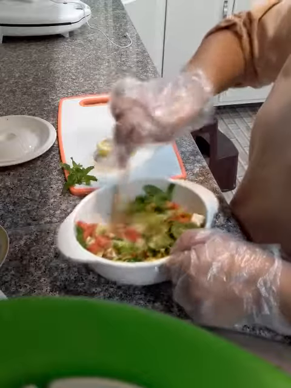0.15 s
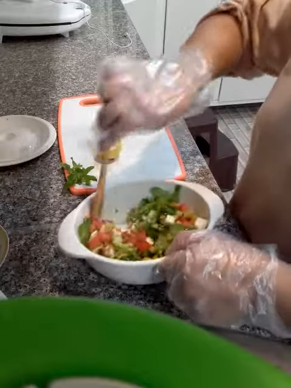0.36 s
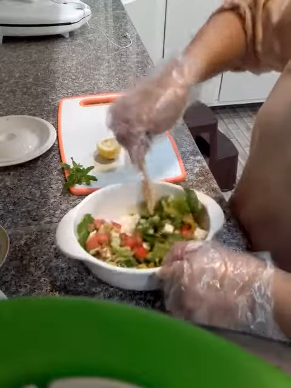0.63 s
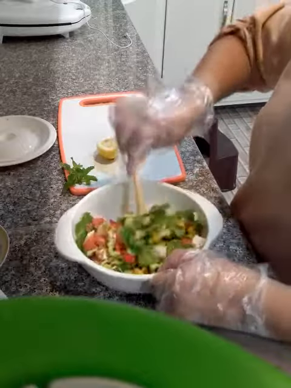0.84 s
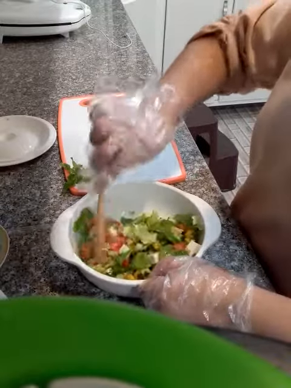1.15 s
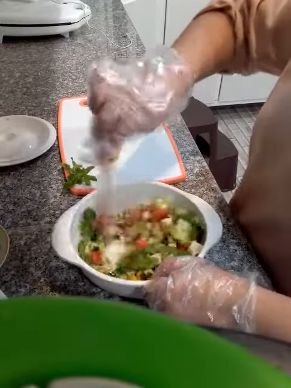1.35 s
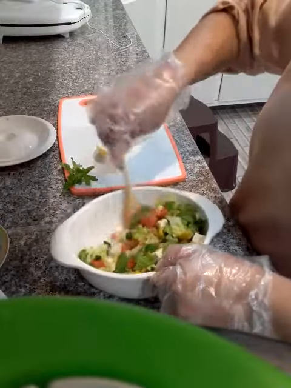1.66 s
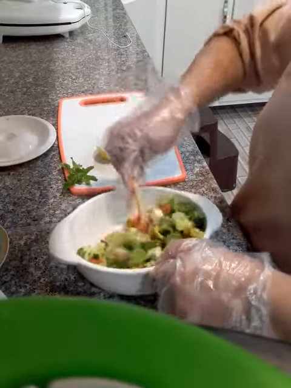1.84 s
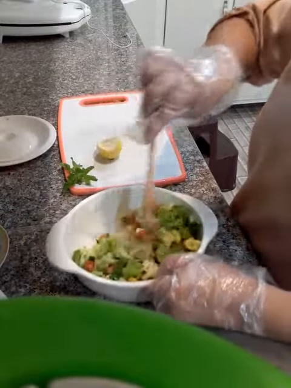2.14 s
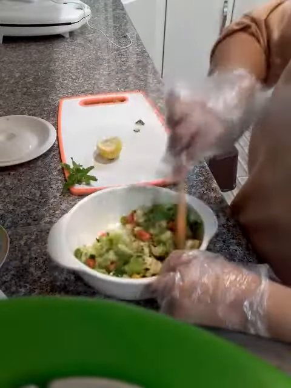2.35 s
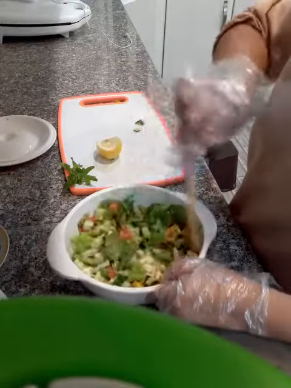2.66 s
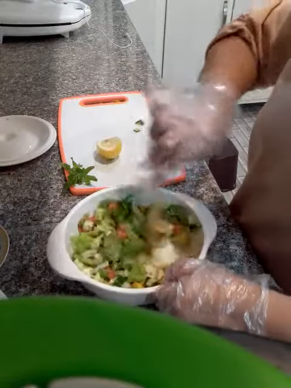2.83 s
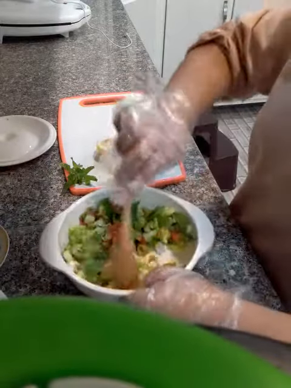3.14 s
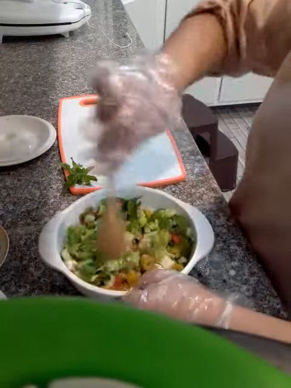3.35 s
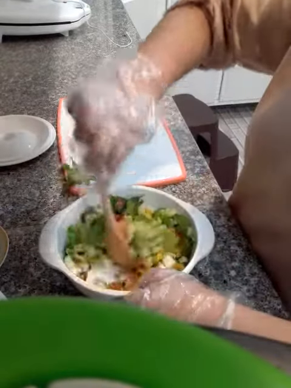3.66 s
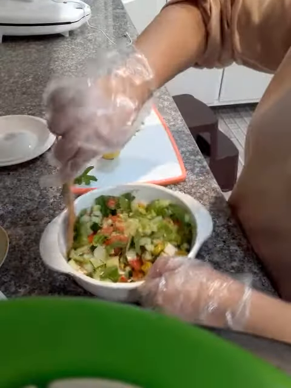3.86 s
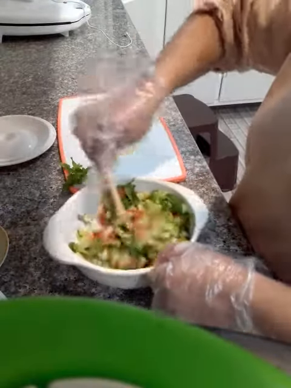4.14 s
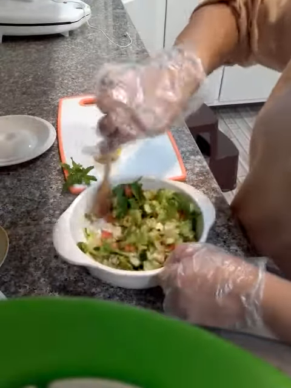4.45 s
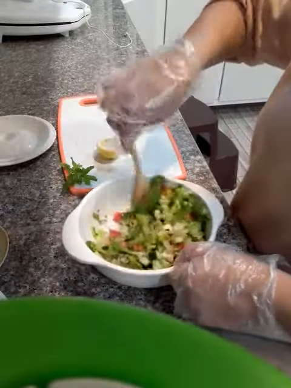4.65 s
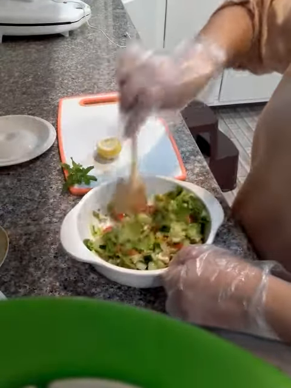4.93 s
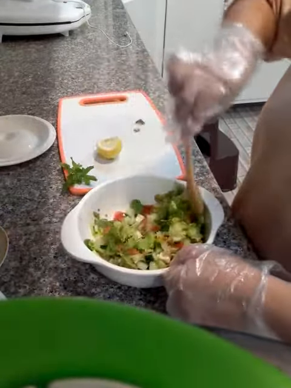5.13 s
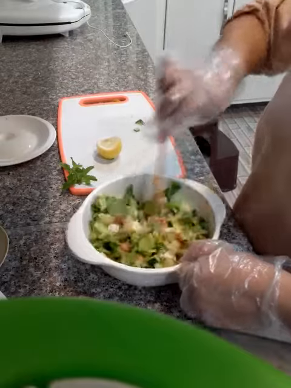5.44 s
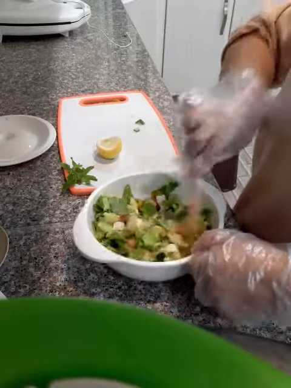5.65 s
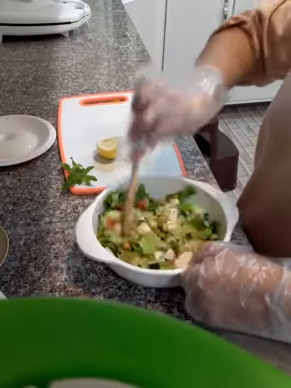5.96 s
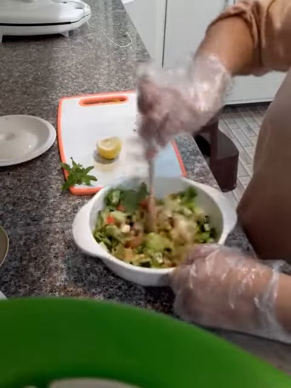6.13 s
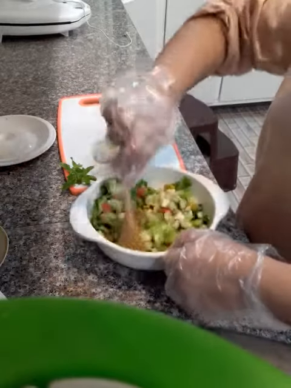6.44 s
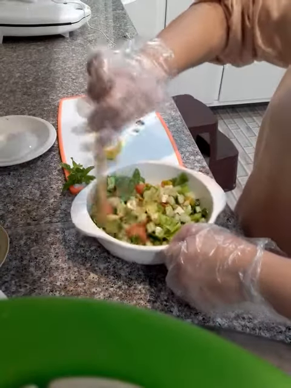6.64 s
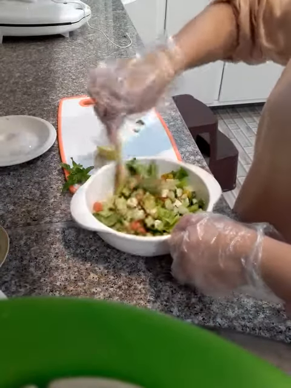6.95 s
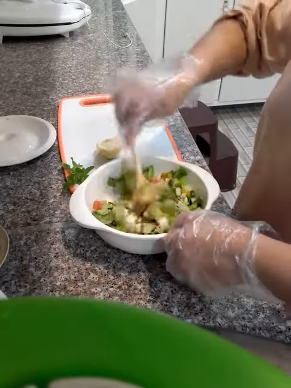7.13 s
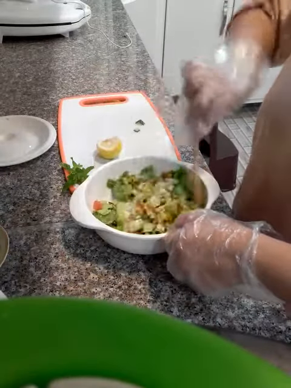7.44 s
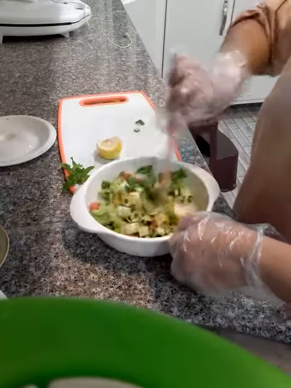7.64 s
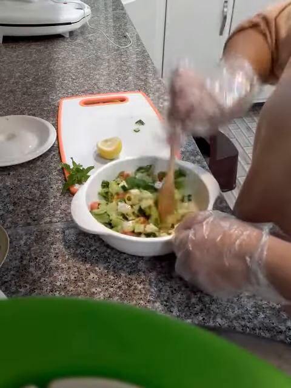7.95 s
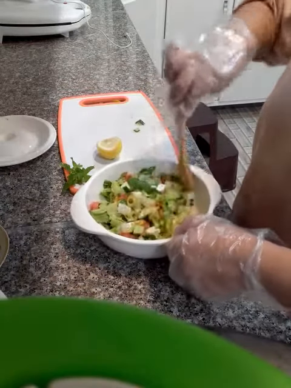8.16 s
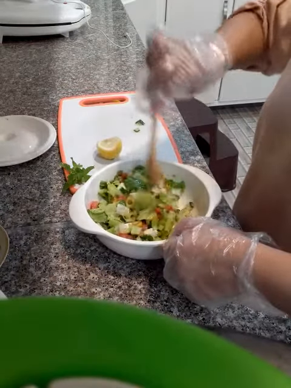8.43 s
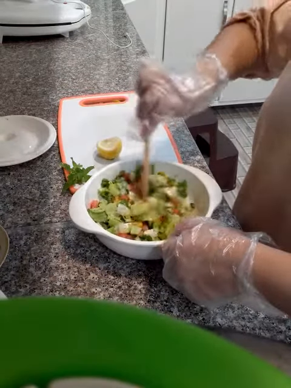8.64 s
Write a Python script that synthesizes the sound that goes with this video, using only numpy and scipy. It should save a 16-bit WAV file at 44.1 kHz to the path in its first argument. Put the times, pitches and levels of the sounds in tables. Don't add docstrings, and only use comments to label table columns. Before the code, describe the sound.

A small close mono microphone in a hard-walled kitchen hears a wooden spoon tossing dressed salad in a ceramic bowl, with thin bass, soft hiss and a short bright room answer. A sharp clink opens at 0.1 seconds, followed by wet rustling strokes, gloves crinkling and small leafy ticks. Another clink at 0.5 and a firmer one at 1.5 start longer sweeps. From 2.4 to 2.9 comes a tight cluster of woody knocks, scrapes, a clink and dull bumps of the bowl's foot on stone. Rustling sweeps resume at 3.5 and 3.9, with a heavy bump near 4.4 and a clink at 4.5. A hard crunchy double knock lands at 5.8, a clink at 6.4, a knock at 6.8. Clinks at 7.4 and 7.8 lead to a solid clack and thump near 7.95, then lighter rustling fades toward 8.8.

```python
import sys
import numpy as np
from scipy import signal
from scipy.fft import rfft, irfft, next_fast_len
from scipy.io import wavfile
from scipy.ndimage import map_coordinates

SR = 44100
rng = np.random.default_rng(int(sys.argv[2]) if len(sys.argv) > 2 else 0)


def bounce(signal):
    frames = np.transpose(np.atleast_2d(signal))
    limited = np.clip(frames, -1, 1)
    pcm = np.round(limited * 32767).astype(np.int16)
    wavfile.write(sys.argv[1], SR, pcm)


def decibels_to_gain(level_db):
    exponent = np.asarray(level_db, float) / 20
    return 10 ** exponent


N = 387638


def unit(x):
    return x / np.sqrt(np.mean(x ** 2) + 1e-20)


def along(points, hz):
    point_hz, value = np.transpose(points)
    return np.interp(np.log(hz + 1), np.log(point_hz + 1), value)


def wobble(rate_hz):
    knots = rng.standard_normal(int(N * rate_hz / SR) + 4)
    return map_coordinates(knots, [np.arange(N) * rate_hz / SR])


def filtered(x, response):
    m = next_fast_len(N + SR // 2)
    return irfft(rfft(x, m) * response(np.fft.rfftfreq(m, 1 / SR)), m)[:N]


def noise_coloured(points):
    return filtered(rng.standard_normal(N), lambda hz: decibels_to_gain(along(points, hz)))


def crackle(rate_hz, spread_db, share):
    slips = (rng.random(N) < rate_hz / SR) * decibels_to_gain(spread_db * rng.standard_normal(N))
    slips = slips * rng.choice([-1, 1], size=N)
    return np.sqrt(share) * unit(slips) + np.sqrt(1 - share) * rng.standard_normal(N)


# frequency in Hz, t60 in seconds.
KITCHEN_DECAY = [(150, 0.3), (600, 0.33), (1500, 0.45), (4000, 0.55), (8000, 0.36), (14000, 0.19)]


def tail(seconds):
    hz, t, z = signal.stft(rng.standard_normal(int(seconds * SR)), SR, nperseg=256)
    decay = decibels_to_gain(-60 * t / along(KITCHEN_DECAY, hz)[:, None])
    room = signal.istft(z * decay, SR, nperseg=256)[1]
    room[:int(0.006 * SR)] = 0
    return room / np.linalg.norm(room)


# frequency in Hz, density in dB per Hz.
AIR_CURVE = [(19, -9), (32, -11), (54, -21), (134, -11.5), (299, -7), (388, -7), (870, -3), (1280, -14.5),
             (1500, -8.5), (2880, -18.5), (11400, -23.5), (16000, -18.5)]


def air():
    return decibels_to_gain(-64.5) * unit(noise_coloured(AIR_CURVE))


def gestures(rows, attack_s, sag_db_per_s, release_db_per_s):
    out = np.zeros((len(rows[0]) - 2, N + SR))
    t = np.arange(SR) / SR
    for start_s, length_s, *levels_db in rows:
        fall_db = sag_db_per_s * t + release_db_per_s * np.maximum(t - length_s, 0)
        shape = np.clip(t / attack_s, 0, 1) ** 2 * decibels_to_gain(-fall_db)
        out[:, round(start_s * SR):][:, :SR] += decibels_to_gain(levels_db)[:, None] * shape
    return out[:, :N]


# start in seconds, length in seconds, rustle in dB, pressure on the bottom in dB.
STROKES = [(0.0, .06, -80, -62), (0.1, 0.16, -58, -54.5), (0.47, 0.27, -57.5, -54.5),
           (0.75, .13, -62.5, -54), (0.9, 0.29, -74, -70), (1.19, 0.12, -60, -51.5), (1.51, 0.57, -57, -53),
           (2.36, 0.16, -66, -63), (2.49, .23, -68.5, -61), (2.75, .28, -61, -60), (3.09, .15, -60.5, -59),
           (3.52, 0.17, -60, -55.5), (3.86, 0.42, -57, -54.5), (4.49, 0.28, -57.5, -54.5),
           (4.92, .14, -65, -65), (5.18, 0.15, -63.5, -65), (5.27, 0.035, -56, -56),
           (5.52, 0.047, -65, -68), (5.64, 0.31, -56.5, -54), (6.05, .14, -59.5, -55),
           (6.29, 0.11, -57.5, -50.5), (6.42, 0.13, -59, -59), (6.77, 0.18, -59, -57),
           (7.02, 0.048, -63, -56.5), (7.45, 0.17, -58.5, -53.5), (7.82, 0.31, -57.5, -70.5),
           (8.2, 0.12, -61, -66), (8.61, 0.091, -67.5, -70)]
# start in seconds, length in seconds, bottom grind in dB, leaf crush in dB.
DIGS = [(0.1, 0.092, -68, -48), (0.49, 0.03, -62, -58), (2.5, 0.13, -45.5, -64), (2.65, 0.036, -39.5, -56),
        (2.79, 0.072, -50, -45), (2.87, 0.018, -44, -48), (3.69, 0.03, -56.5, -72), (4.14, 0.031, -63, -65),
        (5.78, 0.021, -31, -34.5), (6.42, 0.013, -43, -45), (7.96, 0.04, -44, -44.5),
        (8.12, 0.027, -50, -71)]


def motion():
    rustle, press = gestures(STROKES, attack_s=0.01, sag_db_per_s=12.5, release_db_per_s=126.5)
    grind, crush = gestures(DIGS, attack_s=0.02, sag_db_per_s=0, release_db_per_s=253.5)
    rest_rustle_db, rest_scrape_db, leaves_over_rustle_db = -81.5, -73, -1
    return rustle + decibels_to_gain(rest_rustle_db), press + grind + decibels_to_gain(rest_scrape_db), decibels_to_gain(leaves_over_rustle_db) * rustle + crush


# frequency in Hz, width in Hz, level in dB.
SCRAPE_MODES = [(330, 100, -9), (647, 90, -0.5), (873, 40, 3.5), (1061, 104, -1.5), (1550, 340, -8.5)]
# frequency in Hz, density in dB per Hz.
LEAF_CURVE = [(500, -62), (1200, 4.5), (2000, 8.5), (3500, 3), (5500, -12.5), (9000, -56), (16000, -49.5)]
# frequency in Hz, density in dB per Hz.
FIZZ_CURVE = [(1500, -42.5), (3000, -2), (5500, -1.5), (9000, -5.5), (12000, -5), (15800, -16),
              (20000, -18.5)]


def bottom_response(f):
    total = 0
    for k, (centre, width, db) in enumerate(SCRAPE_MODES):
        damping = 1j * f * width
        total = total + (-1) ** k * decibels_to_gain(db) * damping / (centre * centre - f * f + damping)
    return total


def stirring():
    rustle, press, crush = motion()
    jerk = wobble(45)
    rub = decibels_to_gain(2.6 * jerk + 1.4 * wobble(30)) * crackle(900, spread_db=-1.0, share=0.43)
    scrape = filtered(rub, bottom_response)
    tumble = decibels_to_gain(3.7 * jerk + 1.4 * wobble(18)) * crackle(590, spread_db=6.0, share=0.32)
    leaves = filtered(tumble, lambda hz: decibels_to_gain(along(LEAF_CURVE, hz)))
    fizz_db = 0.96 * jerk + 2.4 * wobble(120) + 0.5 * wobble(9.5)
    fizz = decibels_to_gain(fizz_db) * crackle(500, spread_db=4.5, share=0.23)
    fizz = filtered(fizz, lambda hz: decibels_to_gain(along(FIZZ_CURVE, hz)))
    return press * unit(scrape) + crush * unit(leaves) + rustle * unit(fizz)


# frequency in Hz, density in dB per Hz.
RUMBLE_CURVE = [(40, -38.5), (85, -4), (130, 2), (220, -3.5), (330, -3.5), (500, -15.5), (900, -69.5)]


def counter():
    press = motion()[1]
    drag = unit(noise_coloured(RUMBLE_CURVE))
    return decibels_to_gain(-66 + 1.7 * wobble(5.9)) * (press / np.median(press)) ** 0.32 * drag


# frequency in Hz, level in dB, t60 in seconds.
BOWL_MODES = [(132, -3, .12), (203, -4, 0.028), (306.6, -2.5, 0.096), (428, 3.5, 0.045), (560.6, -8, 0.012),
              (611, -6, 0.043), (744, -17.5, 0.0045), (837, -2, 0.032), (976, 0.5, 0.018),
              (1043, -17.5, 0.022), (1162, -13.5, 0.028), (1133, -4.5, 0.034), (1487, 0, 0.029),
              (1603, -4.5, .025), (1785, -8, 0.052), (1873, -8.5, 0.014), (2049, -9.5, 0.033),
              (2100, -29.5, 0.0049), (2542, -5, 0.0037), (2751, -2, 0.01), (3100, -3.5, 0.0065),
              (3410, -7, 0.032), (3600, -1.5, 0.035), (3840, -6.5, 0.013), (4695, -2, 0.0093),
              (5920, 0, 0.0071), (6230, -0.5, 0.012), (6960, -10, .02)]


def strike(levels, favoured, contact_s, hold_s, clack_db, wet_db):
    t = np.arange(SR // 6) / SR
    late = np.maximum(t - hold_s, 0)
    modes = BOWL_MODES + [(f, lift_db, 0.027) for f, lift_db in favoured]
    hz, db, t60 = np.transpose(modes)[:, :, None]
    db = db + along(levels, hz) + rng.normal(0, 0.3, hz.shape)
    rise = 1 - np.exp(-(t / (contact_s + 0.73 / hz)) ** 2)
    tones = np.sin(2 * np.pi * (hz * t + rng.random(hz.shape)))
    ring = (decibels_to_gain(db - 60 * late / t60) * rise * tones).sum(0)

    burst_rise = 1 - np.exp(-(t / contact_s / 2.18) ** 2)
    burst = rng.standard_normal(len(t)) * decibels_to_gain(-60 * late / 0.033) * burst_rise
    click = rng.standard_normal(len(t)) * decibels_to_gain(-3.0 - 60 * t / 0.0084) * (t > contact_s)
    burst = burst + click

    def colour(v):
        gain_db = clack_db + along(levels, np.fft.rfftfreq(len(v), 1 / SR))
        return irfft(rfft(v) * decibels_to_gain(gain_db), len(v))

    clack, room = colour(burst), tail(0.55)
    out = decibels_to_gain(wet_db) * signal.fftconvolve(ring, room)
    out[:len(room)] += decibels_to_gain(wet_db - 1.13) * np.linalg.norm(burst) * colour(room)
    out[:len(t)] += ring + clack
    return out


def place(out, blow, start_s, db):
    out[round(start_s * SR):][:len(blow)] += decibels_to_gain(db) * blow


# time in seconds, peak in dB, low modes in dB, upper modes in dB, crack in dB, landing spot.
CLINKS = [(0.0864, -13.5, -4.5, -15.5, -16.5, "lip"), (0.46, -22.5, -10, -21, -18.5, "side"),
          (1.5011, -14, -6, -8, -15.5, "handle"), (2.7415, -13.5, -8.5, -14.5, -14.5, "shoulder"),
          (3.51, -28, 1, -11.5, -30, "rim"), (3.8584, -17.5, -4, -5.5, -15, "far rim"),
          (4.4606, -16, -6.5, -8.5, -13, "side"), (5.6346, -21, -5, -10, -21, "rim"),
          (6.1, -29, 2, -11, -15.5, "foot"), (6.3829, -16.5, -4, -10, -10.5, "near rim"),
          (7.4429, -16.5, -7, -6.5, -11, "near wall"), (7.8201, -13, -10, -13, -14, "foot"),
          (7.962, -15.5, 5, -8.5, -15.5, "floor"), (8.18, -22.5, -4.5, -13.5, -22.5, "floor")]
SPOT_MODES = {"lip": [(570, 8), (1100, 8.5), (1920, 1.5), (2800, 4)], "side": [(575, 10.5), (1000, 0.5)],
              "handle": [(570, 2), (2030, -0.5), (3470, 1.5), (3750, -4)], "near wall": [(870, 5.5),
              (2030, -5), (2435, 4.5)], "floor": [(620, 5), (870, 9), (1660, 4)], "shoulder": [(850, 7),
              (2820, 7)], "rim": [(1980, -2), (2800, 7.5), (3700, -2)], "near rim": [(1460, 0.5),
              (2790, 11), (2950, -5), (3700, -1)], "far rim": [(2015, 12.5), (2820, 2), (4400, 2)],
              "foot": [(880, 5.5), (1490, -1), (2440, -4)]}


def clinks():
    out = np.zeros(N + SR)
    thump = -29.5
    for s, db, low, upper, crack, spot in CLINKS:
        levels = [(70, thump - 40), (125, thump - 12), (430, thump - 8), (560, low - 11), (1200, low - 9),
                  (1500, -13), (2400, -11), (2800, upper - 8), (3700, upper - 8), (4600, crack - 8),
                  (7800, crack - 11), (9000, crack - 23), (16000, crack - 33)]
        blow = strike(levels, SPOT_MODES[spot], contact_s=0.00092, hold_s=0.0038, clack_db=13.5, wet_db=-3.0)
        place(out, blow, s - 0.001, db)
    return out[:N]


# time in seconds, peak in dB, share of the base's upper modes in dB.
THUMPS = [(0.088, -38.5, 3), (0.461, -44, 3), (0.851, -48, 2), (1.182, -36, -8), (1.262, -29.5, -10),
          (1.502, -45.5, 5), (2.005, -60, 0), (2.497, -30, -6), (2.573, -34, 0), (2.619, -39, 1),
          (2.688, -33.5, -2), (2.868, -25.5, -6), (3.512, -49.5, 4.5), (3.86, -48, 5.5), (4.373, -21, -5.5),
          (4.901, -46.5, -2), (5.197, -42, -9.5), (5.302, -33, -15), (5.778, -24.5, 0), (6.1, -31, -10),
          (6.384, -33, 3), (6.741, -42, -9), (6.809, -32, 1), (7.047, -35, -3.5), (7.442, -44.5, 5),
          (7.808, -36, 2.5), (7.925, -21.5, -13.5), (7.962, -27.5, 5.5), (8.182, -46, 10.5)]


def thumps():
    out = np.zeros(N + SR)
    for s, db, base_db in THUMPS:
        levels = [(70, -17), (135, -6.5), (300, base_db - 3), (430, base_db - 5.5), (600, -22), (16000, -88)]
        blow = strike(levels, [], contact_s=0.0029, hold_s=0.0036, clack_db=17.5, wet_db=-3)
        place(out, blow, s - 0.0015, db)
    return out[:N]


# time in seconds, peak in dB.
TICKS = [(0.5347, -30), (0.604, -37.5), (0.78, -39), (0.8604, -41), (0.9303, -59), (0.9936, -39),
         (1.2284, -37.5), (2.9527, -43), (3.0465, -47), (3.8217, -47.5), (4.0497, -39.5), (4.1425, -42.5),
         (4.1699, -37.5), (4.2403, -44), (4.711, -37), (4.8993, -42), (5.025, -45), (5.055, -47),
         (5.2485, -41.5), (5.301, -35), (5.3153, -35), (5.4335, -47.5), (6.0227, -40.5), (6.0846, -45),
         (6.1779, -43), (6.5959, -45), (6.8992, -42.5), (7.0305, -44), (8.2262, -50), (8.2806, -51)]


def ticks():
    out, t = np.zeros(N + SR), np.arange(SR // 40) / SR
    for s, db in TICKS:
        puff = rng.standard_normal(len(t)) * decibels_to_gain(0.5 - 60 * t / 0.011) * (1 - np.exp(-t / 0.001))
        pitch_hz = 6000 * decibels_to_gain(rng.normal(0, 2.1))
        chirp = np.sin(2 * np.pi * pitch_hz * t) * decibels_to_gain(-9 - 60 * t / 0.012)
        place(out, puff + chirp, s, db + 4.5)
    return filtered(out[:N], lambda hz: decibels_to_gain(along(FIZZ_CURVE, hz)))


# time in seconds, peak in dB, favoured mode in Hz, hardness in dB.
KNOCKS = [(0.728, -36, 1074, -8), (1.182, -41.5, 558, -8), (1.232, -48, 570, -20), (1.262, -32.5, 548, -13),
          (2.005, -28.5, 934, -17), (2.109, -31, 922, -18), (2.438, -38, 485, -10), (2.508, -26, 586, -7.5),
          (2.58, -32.5, 580, -18), (2.622, -22.5, 600, -10), (2.66, -23, 563, -10), (2.688, -34, 576, -1.5),
          (2.867, -20, 902, -6), (2.89, -26, 1010, -27), (2.495, -35.5, 980, -10), (4.155, -38.5, 1150, -6),
          (4.366, -26.5, 947, -11.5), (4.373, -28, 810, -6.5), (5.304, -44, 624, -6),
          (5.767, -21, 945, -13), (5.776, -17, 614, -8), (5.787, -17, 607, -14), (5.808, -24.5, 1010, -28),
          (6.74, -36.5, 974, -5.5), (6.808, -20, 955, -8.5), (6.835, -31.5, 986, -26),
          (7.045, -29.5, 754, -18), (7.172, -37, 510, -15), (7.806, -27, 860, -8.5), (7.926, -30, 853, -10)]


def knocks():
    out = np.zeros(N + SR)
    thump = -21.5
    for s, db, hz, upper in KNOCKS:
        crack = upper - 7
        near = [(f, -2 - 13 * abs(np.log2(f / hz))) for f in (529, 740, 1063, 1200)]
        levels = [(70, thump - 36), (125, thump - 5), (430, thump - 6), *near, (1500, upper - 5),
                  (2200, upper - 11), (2800, crack - 7), (7800, crack - 16), (16000, crack - 36)]
        blow = strike(levels, [(hz, 2.5)], contact_s=0.0025, hold_s=0.0069, clack_db=10.0, wet_db=-5)
        place(out, blow, s - 0.0015, db)
    return out[:N]


def scene():
    small = stirring() + ticks()
    room = decibels_to_gain(-12) * signal.fftconvolve(small, tail(0.6))[:N]
    return (clinks() + thumps() + knocks() + small + room + counter())[None]


def band_limit(x):
    return signal.sosfilt(signal.butter(12, 16450, fs=SR, output="sos"), x)


def record(dry):
    thin = filtered(dry[0], lambda hz: (1j * hz / (70 + 1j * hz)) ** 3)
    mix = filtered(thin + air(), lambda hz: hz < 15900)
    return band_limit(mix[None])


dry = scene()
out = record(dry)
bounce(out)
```